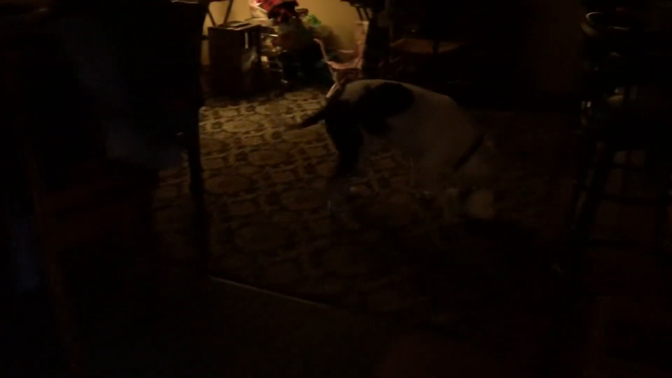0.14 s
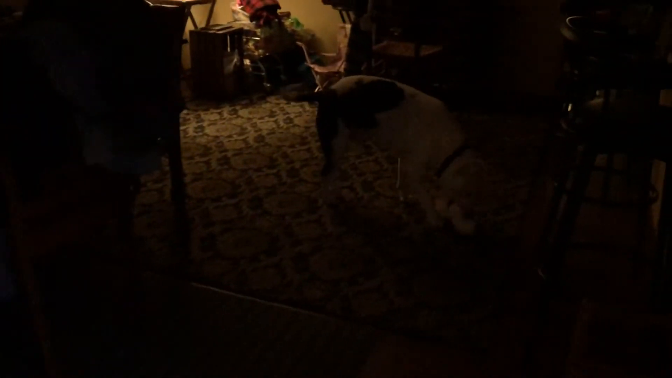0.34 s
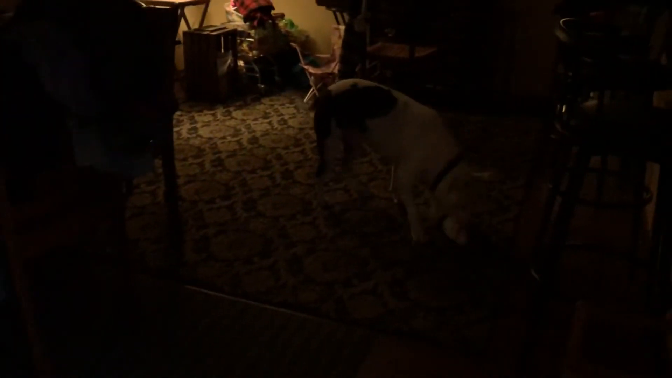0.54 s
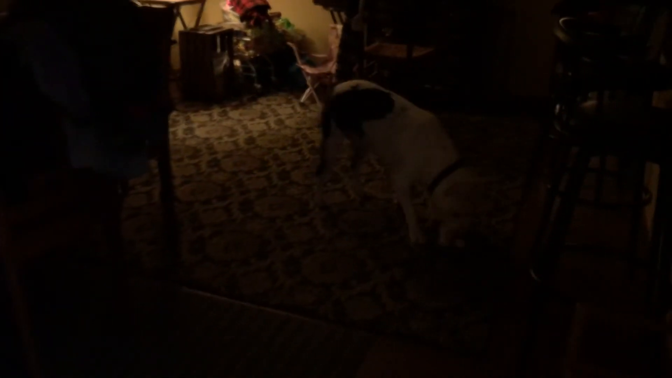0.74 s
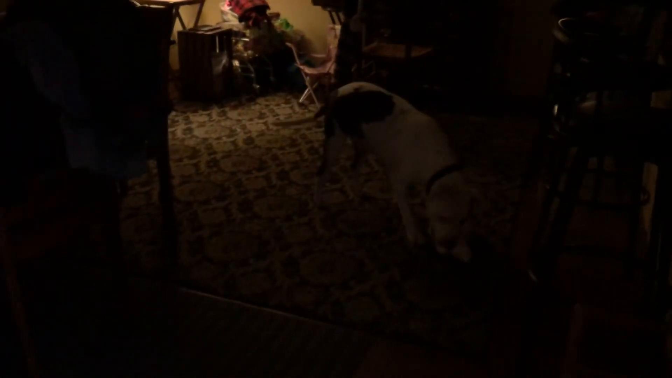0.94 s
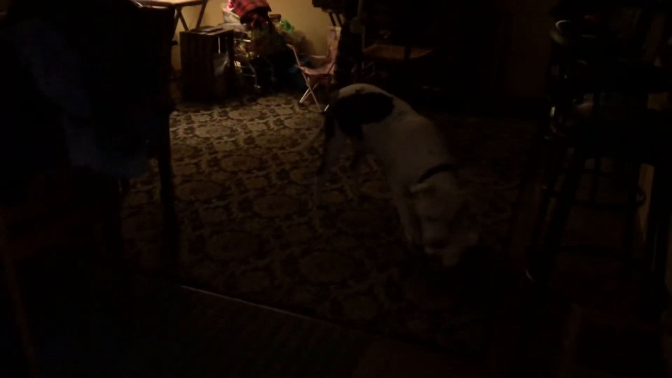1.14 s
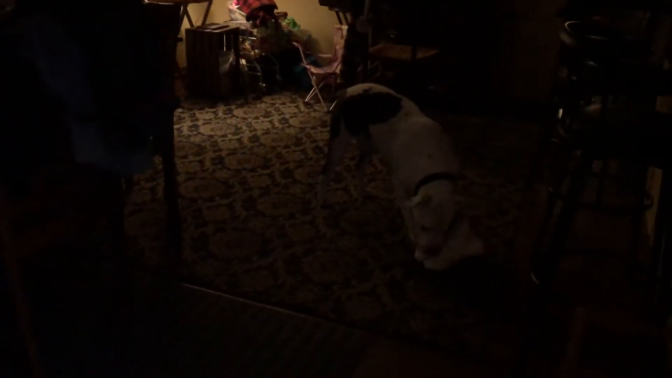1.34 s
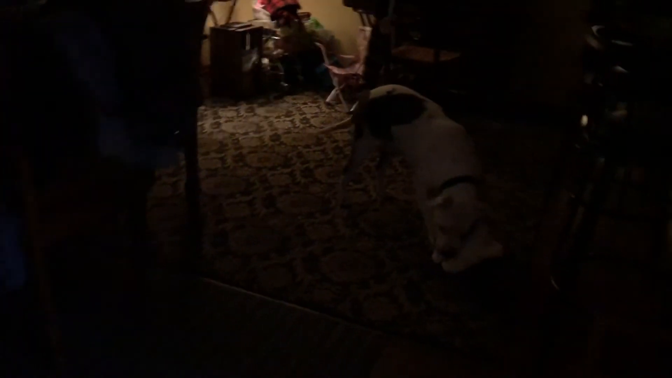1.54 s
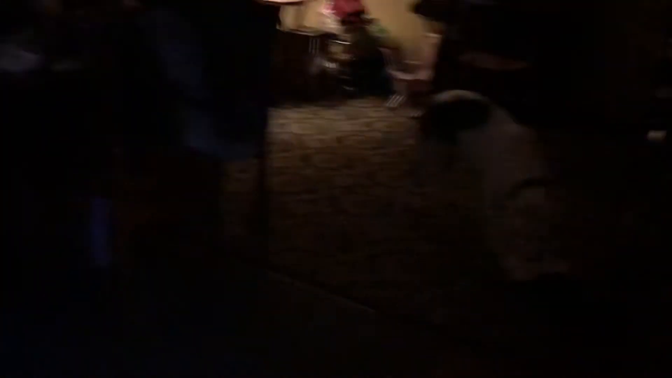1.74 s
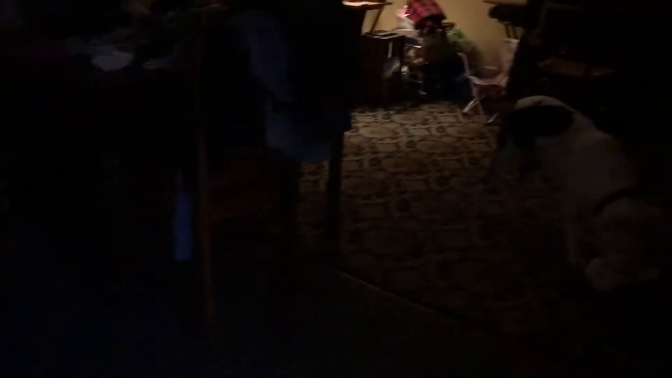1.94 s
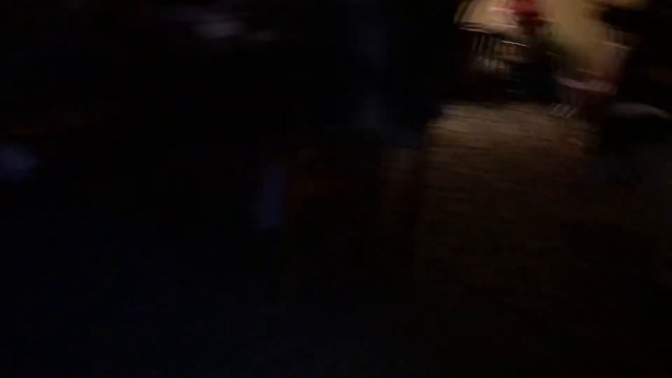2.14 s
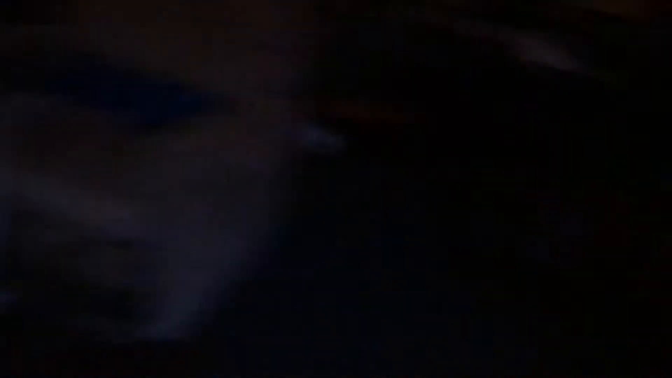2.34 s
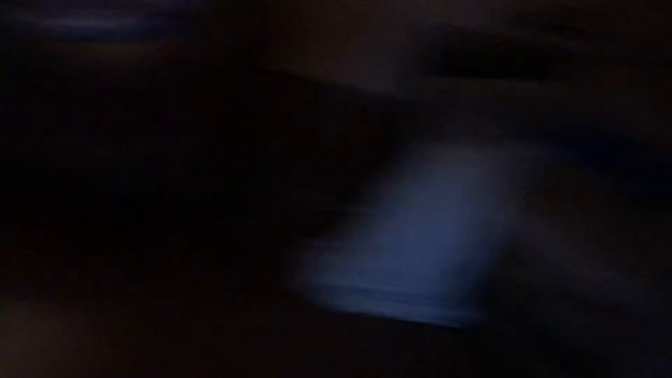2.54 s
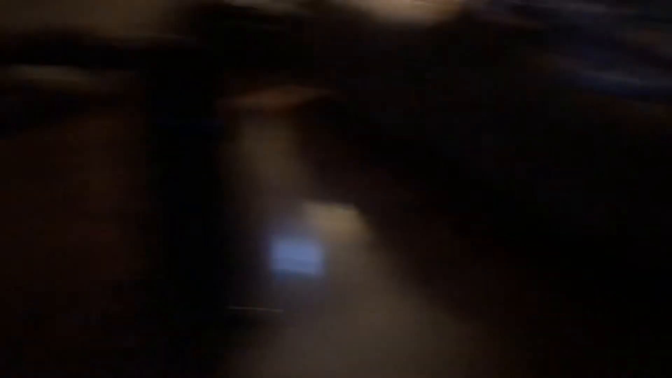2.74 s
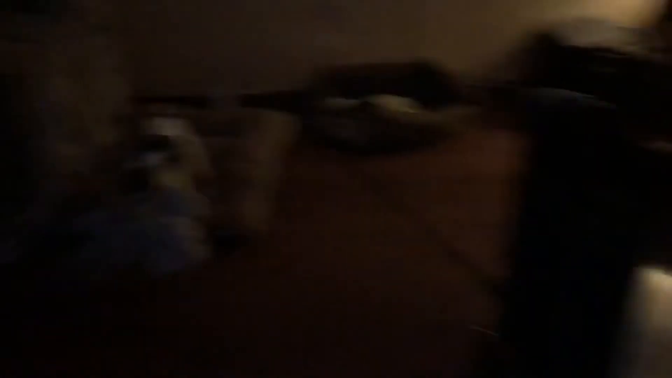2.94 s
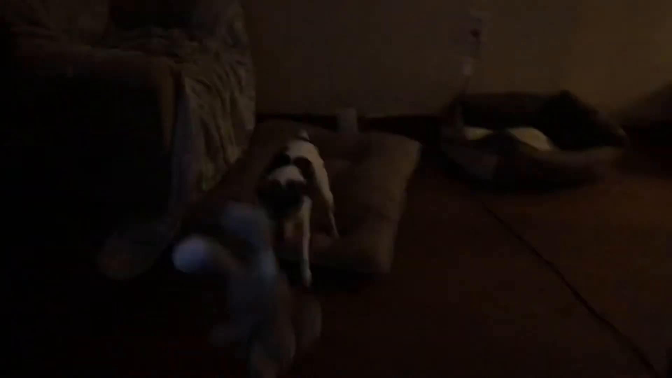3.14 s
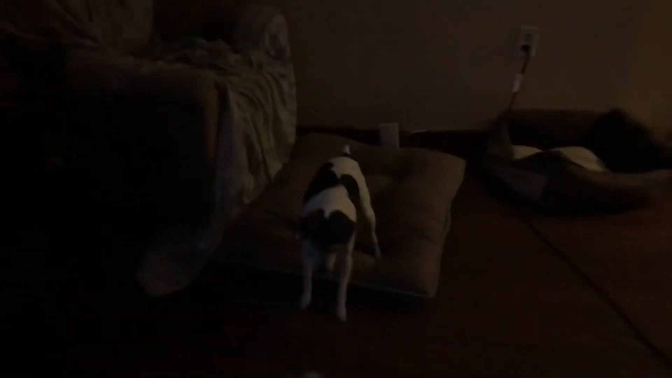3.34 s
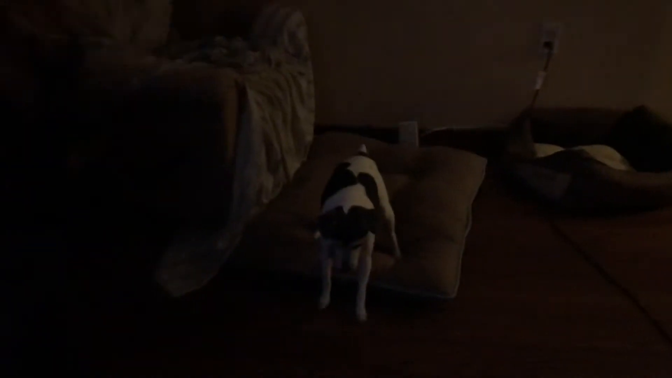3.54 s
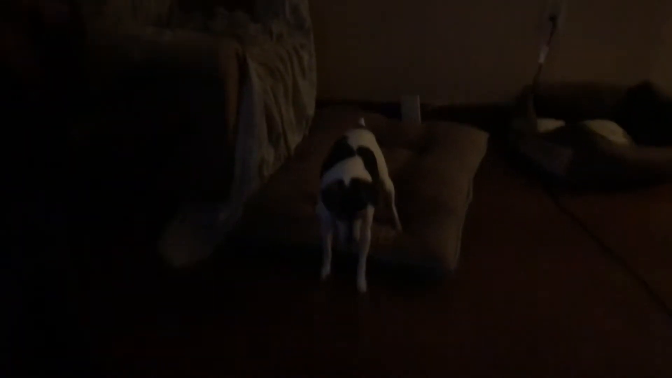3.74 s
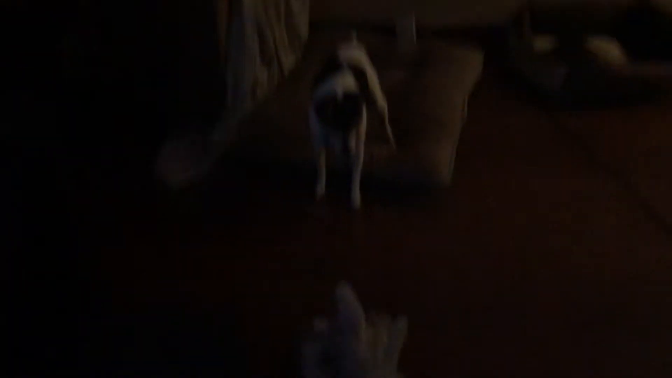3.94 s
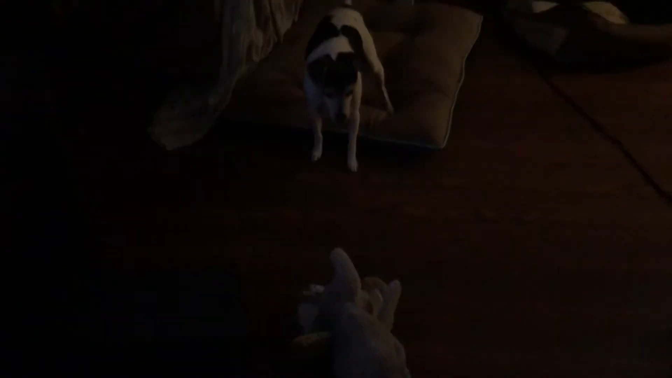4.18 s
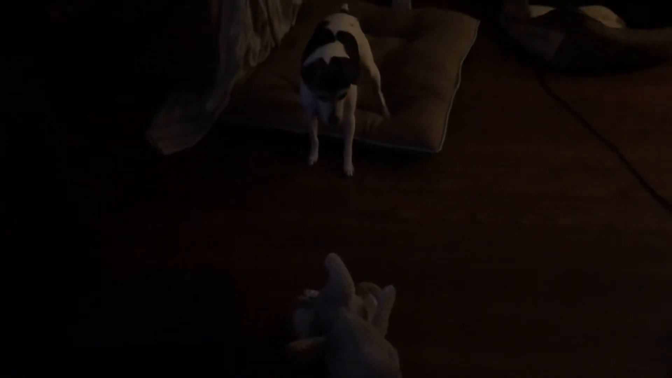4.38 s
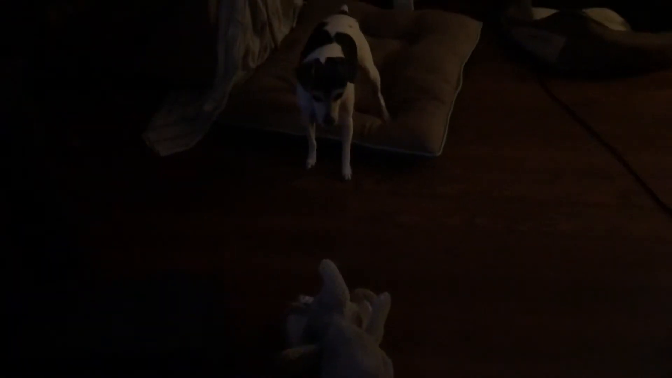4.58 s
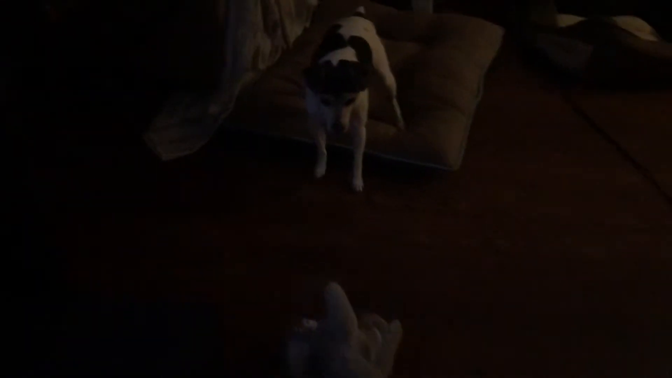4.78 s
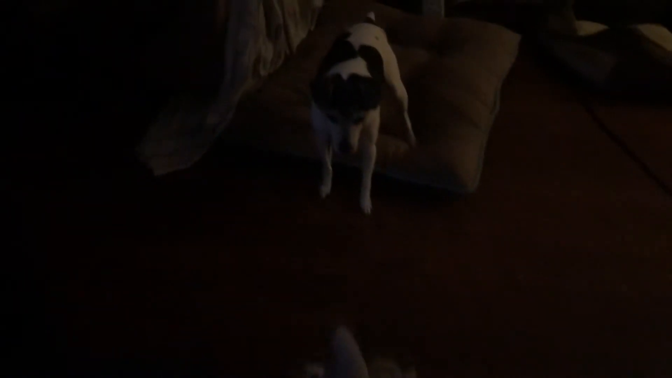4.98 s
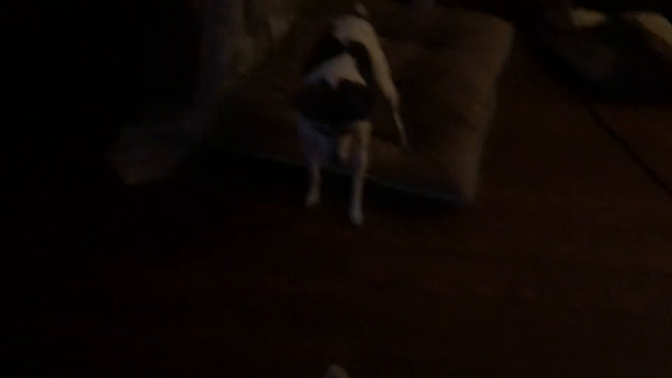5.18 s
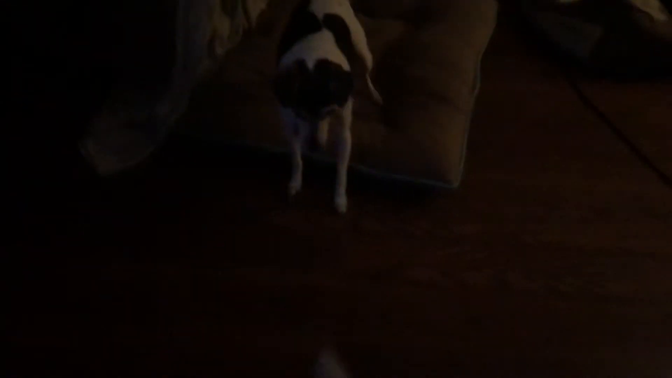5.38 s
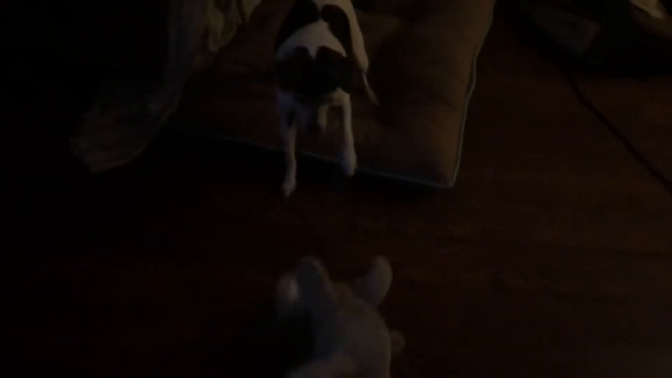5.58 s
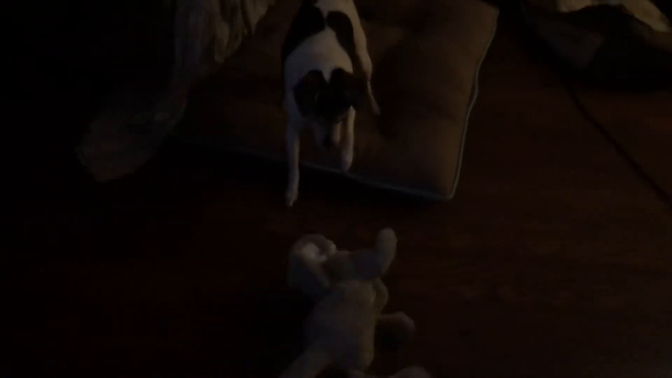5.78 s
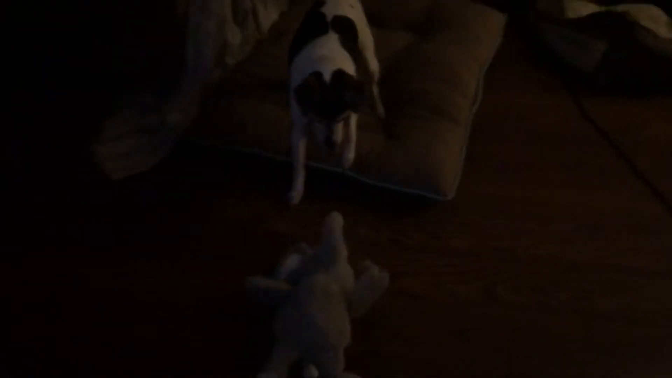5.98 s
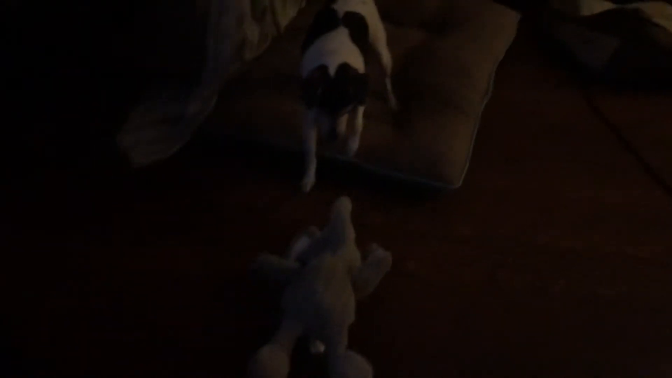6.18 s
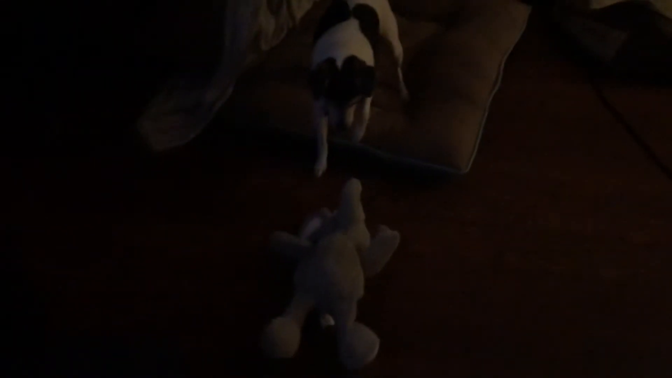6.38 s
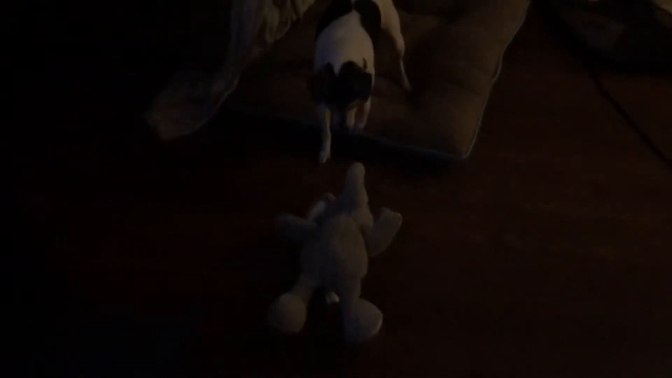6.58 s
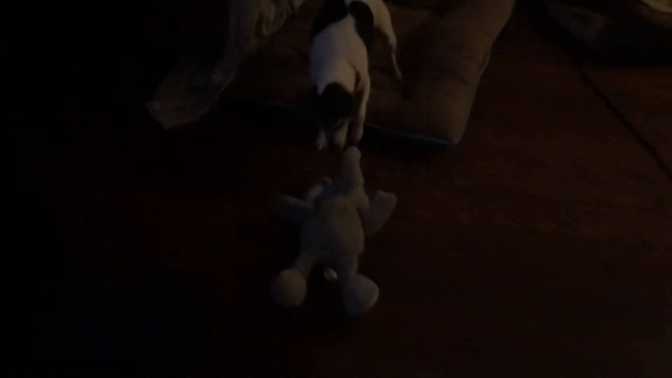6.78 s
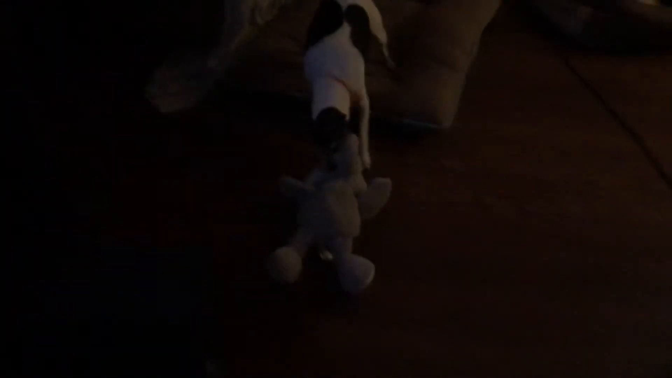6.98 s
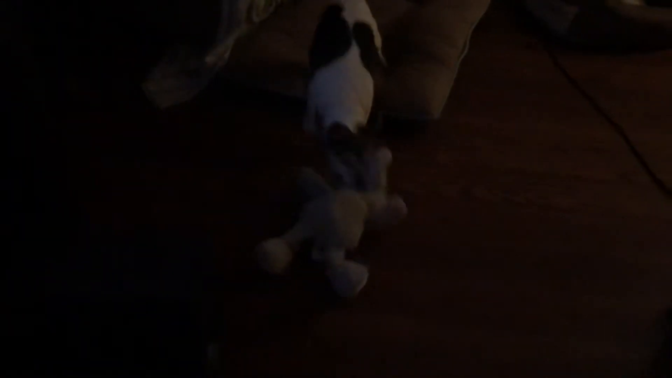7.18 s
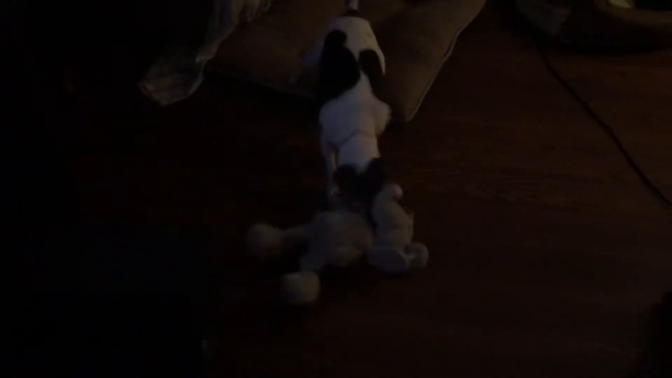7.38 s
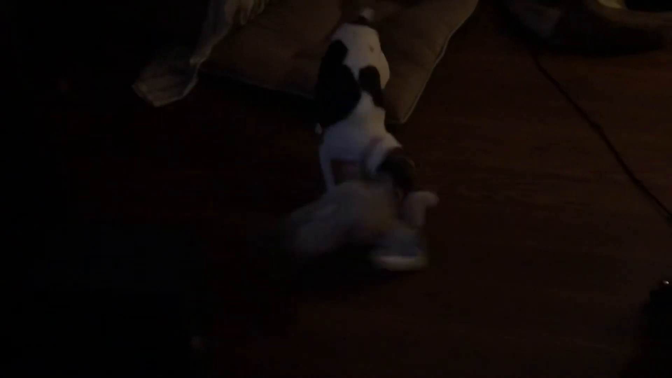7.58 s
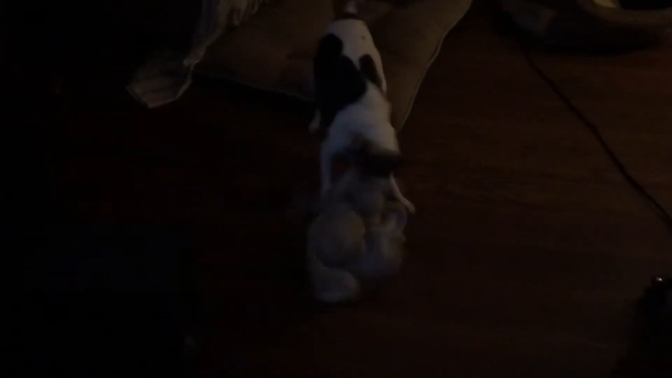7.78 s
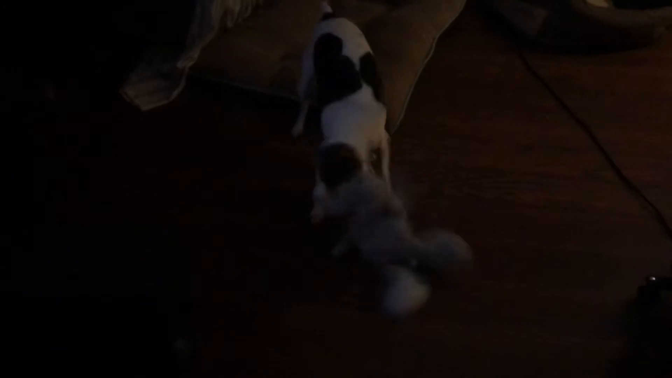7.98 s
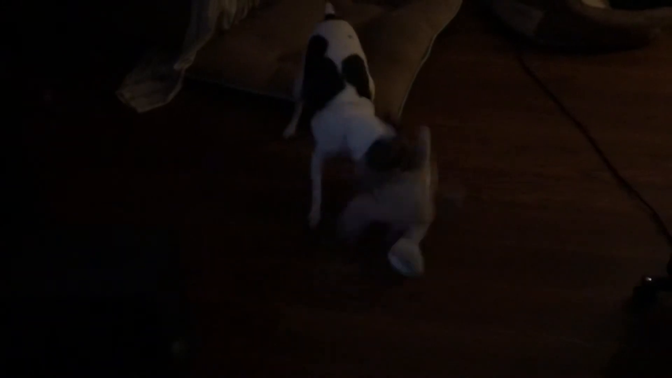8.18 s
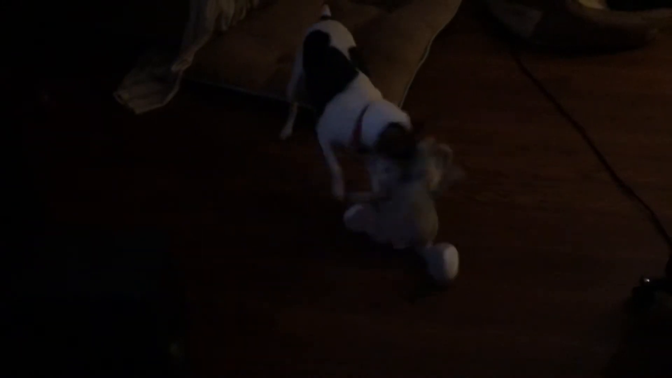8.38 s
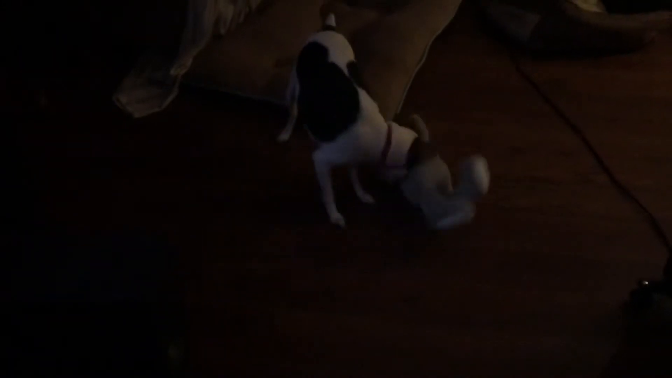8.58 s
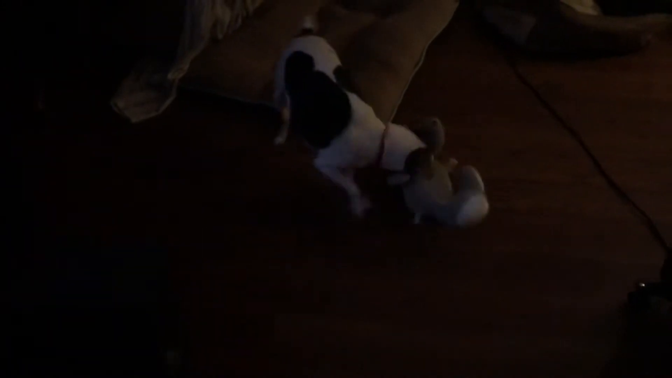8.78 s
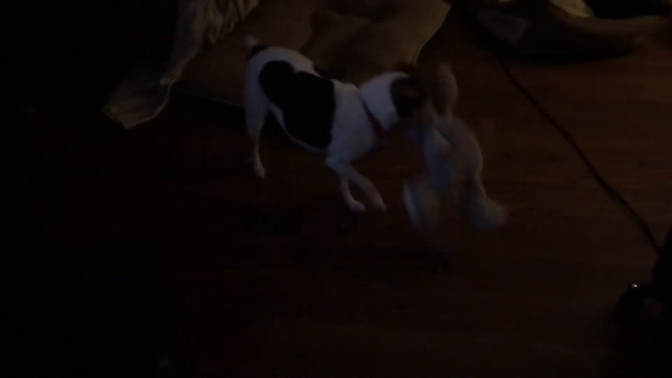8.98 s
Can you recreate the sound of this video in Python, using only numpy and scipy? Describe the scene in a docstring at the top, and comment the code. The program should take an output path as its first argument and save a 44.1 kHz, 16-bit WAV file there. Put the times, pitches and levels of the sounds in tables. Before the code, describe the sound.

Two puppies play on rug and wooden floor. A close squeaker chirps twice almost at once, followed by plush rustle and brief soft growling. A busy scuffle of paws, claws and a tag clink follows, then a handful of tiny distant squeaks. A faint whine passes in a calmer moment before the loudest part: plush thrashing, low floor thumps and sharp claw ticks. Handheld microphone, small room echo, faint low hush.

```python
"""A soft thump and a short scrape, then two clear toy squeaks: two puppies play on carpet and boards in a room.
A squeak is a reed's stack of harmonics with air hiss; paws, claws and a dragged toy are short shaped noises.
A collar tag rings as dying tones, one dog growls softly in throat pulses, and one whines a faint breathy tone.
Plush and cloth rustle as clumps of tiny clicks over a trembling floor, a few echoes and the still room's hush."""
import sys
import numpy as np
from scipy import signal
from scipy.fft import rfft, irfft
from scipy.io import wavfile

SR = 44100
rng = np.random.default_rng(int(sys.argv[2]) if len(sys.argv) > 2 else 0)


def master_out(mix):
    """Clip the mix to full scale and print it as 16-bit PCM to the path in sys.argv[1]."""
    frames = np.transpose(np.atleast_2d(mix))
    ceiling = np.clip(frames, -1, 1)
    pcm = np.round(ceiling * 32767).astype(np.int16)
    wavfile.write(sys.argv[1], SR, pcm)


N = 397782


def from_db(db):
    """Turns a level in dB into a gain."""
    return 10 ** (np.asarray(db) / 20)


def rms_one(x):
    """Scales a sound to an average strength (rms) of 1."""
    return x / np.sqrt(np.mean(x ** 2) + 1e-20)


def in_time(rows):
    """Draws straight lines between the rows of a table, one curve for each column after the time."""
    s, *columns = np.transpose(rows)
    return [np.interp(np.arange(N) / SR, s, column) for column in columns]


def at_hz(points, hz):
    """Reads a spectrum table at any frequency, on a log frequency axis."""
    point_hz, point_db = np.array(points).T
    return np.interp(np.log(hz), np.log(point_hz), point_db)


def drift(rate):
    """Random wandering of spread 1, quicker for a higher rate [Hz]; made at every 40th sample."""
    r = np.exp(-80 * np.pi * rate / SR)
    noise = rng.standard_normal(N // 40 + 2002)
    slow = signal.lfilter([1], [1, -2 * r, r * r], noise)[2000:]
    return np.interp(np.arange(N) / 40, np.arange(len(slow)), rms_one(slow))


def colour(x, spectrum):
    """Shapes noise to a spectrum that falls away beyond both ends; rms 1."""
    hz = np.arange(1, N // 2 + 2) * SR / N
    closed = [(spectrum[0][0] / 2, -90)] + list(spectrum) + [(spectrum[-1][0] * 2, -90)]
    return rms_one(irfft(rfft(x) * from_db(at_hz(closed, hz)), N))


def resonance(x, hz, width_hz):
    """Lets a band ring like a struck hollow body: two poles, gain 1 on top."""
    r = np.exp(-np.pi * width_hz / SR)
    poles = [1, -2 * r * np.cos(2 * np.pi * hz / SR), r * r]
    return signal.lfilter([(1 - r * r) / 2, 0, (r * r - 1) / 2], poles, x)


def add(out, s, sound, peak_db):
    """Lays a sound in at a time, with a given peak."""
    i = round(s * SR)
    out[i:i + len(sound)] += (sound * from_db(peak_db) / np.abs(sound).max())[:N - i]


# How strong each overtone of the squeaker is, for near and far, bite and release:
# (harmonic number, level [dB])
NEAR_BITE = [(1, -12.5), (2, -5), (3, -7.5), (4, -5.5), (5, -5.5), (6, -3), (7, 1), (8, -2), (9, -12),
             (10, -35.5), (11, -26.5), (12, -17.5), (13, -39), (14, -28.5)]
NEAR_RELEASE = [(1, -4.5), (2, -8.5), (3, -9.5), (4, -5.5), (5, -18.5), (6, -22.5), (7, -4.5), (8, -7),
                (9, -8), (10, -22), (11, -20), (12, -19), (13, -25), (14, -24.5)]
FAR_BITE = [(1, -2.5), (2, -3), (3, -5.5), (4, -4.5), (5, -1.5), (6, 0.5), (7, -1), (8, 1.5), (9, -3),
            (10, -9), (11, -22), (12, -21)]
FAR_RELEASE = [(1, -0.5), (2, -2), (3, -7), (4, -5.5), (5, -11.5), (6, -25), (7, -4.5), (8, 1.5), (9, -1),
               (10, -8), (11, -16), (12, -19)]
LAST_BITE = [(1, 1), (2, -9), (3, -9), (4, -9), (5, -13), (6, -20), (7, -17), (8, -6), (9, -7), (10, -6),
             (11, -13), (12, -15)]
# One voicing for each squeak, in order
VOICINGS = [NEAR_BITE, NEAR_RELEASE, FAR_BITE, FAR_RELEASE, FAR_BITE, FAR_RELEASE, FAR_RELEASE, LAST_BITE]
AIR_DB = -27.5   # air hiss through the reed, against its tone, before the stall
# As the air runs out the reed sags in pitch, breaks up and turns hollow
STALL_S, HOLLOW_DB_PER_SAG = 0.019, 75
BULB_HZ, BULB_WIDTH_HZ, BULB_DB = 1081, 12.5, 5   # the toy's hollow bulb rings on
SWELL_DB = 17.5   # a squeak swells in from this far below its level
# Each squeak of a bitten or released toy: (time [s], length before the stall [s], pitch at start [Hz],
# pitch at top [Hz], pitch at end [Hz], place of the top [0-1], level at start [dB], swell [s],
# fade over the length [dB], pitch unsteadiness [share], sag in the stall [share], roughness [0-1],
# part sent to the room [dB])
SQUEAKS = [(0.246, 0.051, 1052, 1112, 1067, 0.61, -29.5, 0.0026, 0, 0.0012, 0.11, 0.053, -3),
           (0.334, 0.073, 1057, 1083, 1068, 0.41, -35.5, 0.005, -0.5, 0.003, 0.032, 0.08, -3.5),
           (4.057, 0.03, 1230, 1300, 1245, 0.43, -38, 0.02, 4, .018, .012, 0.2, -1),
           (4.115, 0.028, 1284, 1301, 1258, 0.35, -42, 0.0034, 1, 0.017, .012, 0.22, -0.5),
           (4.444, 0.046, 1275, 1297, 1262, 0.53, -39, 0.018, 2.5, 0.019, .015, 0.2, -1.5),
           (4.541, 0.023, 1217, 1269, 1260, 0.48, -39.5, 0.018, -0.5, 0.015, 0.0088, 0.18, -1.5),
           (4.563, .038, 1329, 1363, 1345, 0.55, -40.5, 0.0037, 5, 0.013, 0.008, 0.19, 0.5),
           (5, 0.047, 1220, 1215, 1176, 0.3, -42, 0.014, 4.5, 0.009, 0.012, 0.074, -2)]


def squeaks():
    """A beating reed gives a stack of harmonics with air hissing past; it stalls at the end."""
    dry, to_room = np.zeros(N), np.zeros(N)
    for row, voicing in zip(SQUEAKS, VOICINGS):
        s, length, start_hz, top_hz, end_hz, top, level_db = row[:7]
        swell, fade_db, unsteadiness, sag, roughness, room_db = row[7:]
        t = np.arange(0, length + STALL_S, 1 / SR)
        stall = np.clip((t - length) / STALL_S, 0, 1)

        # The pitch arches with the air pressure
        slack = np.interp(t / length, [0, top, 1], [1, 0, 1]) ** 2
        pitch_hz = top_hz - slack * np.where(t < top * length, top_hz - start_hz, top_hz - end_hz)
        shake = (unsteadiness + 0.041 * stall) * drift(163)[:len(t)]
        cycles = np.cumsum(pitch_hz * (1 - sag * stall + shake)) / SR

        # Each harmonic gets its own gusts; the lowest one grows in the stall
        k, db = np.transpose(voicing)[:, :, None]
        noise = rng.standard_normal((len(k), len(t)))
        gusts = rms_one(signal.lfilter([1], [1, -1.9, .9025], noise))
        db = db + HOLLOW_DB_PER_SAG * sag * np.minimum(4 * stall, 1) * (k == 1)
        waves = np.sin(2 * np.pi * (k * cycles + rng.random(k.shape)))
        tone = rms_one(np.sum(from_db(db) * (1 + roughness * gusts) * waves, axis=0))

        air = rms_one(resonance(rng.standard_normal(len(t)), 10500, 6000))
        swell_in = from_db(-SWELL_DB * np.clip(1 - t / swell, 0, 1))
        edges = np.minimum(t / 0.0054, 1) * (1 - stall) * swell_in
        sound = (tone + from_db(AIR_DB + 9.3 * stall) * air) * edges
        sound = sound * from_db(level_db - fade_db * t / length)
        i = round(s * SR)
        dry[i:i + len(t)] += sound
        to_room[i:i + len(t)] += sound * from_db(room_db)
    near = np.arange(N) < SR      # only the near toy's bulb is heard, fed during the first second
    bulb = resonance(dry * near + 1e-18, BULB_HZ, BULB_WIDTH_HZ)
    return dry + from_db(BULB_DB) * bulb, to_room


# Paws scuffing: (time [s], peak [dB], added treble band [dB], time to die by 60 dB [s])
SCUFFS = [(2.0573, -32, -35, 0.4), (2.39, -36.5, -5, 0.38), (2.4815, -34, -11, 0.24),
          (2.541, -31.5, -32, 0.16), (2.59, -27, -17, 0.21), (2.67, -32.5, -37, 0.25),
          (2.8313, -26.5, 1, 0.52), (3.1682, -21.5, -1.5, 0.21), (3.419, -35.5, 0, 0.28),
          (3.49, -58, 18, 0.25), (3.625, -33.5, -7, 0.22), (4.901, -51.5, -29, 0.11),
          (5.2646, -49, -10, 0.25), (5.3103, -32.5, -28, 0.13), (5.888, -30.5, -21, 0.085),
          (6.8952, -33, -27, 0.11), (6.9283, -30.5, -35, 0.16), (7.0752, -38.5, -14, 0.41),
          (7.4099, -20.5, -5, 0.19), (7.922, -21, 21, 0.32), (8.4446, -29.5, -2, 0.45),
          (8.7176, -21, 9, 0.11), (8.836, -26, 13, 0.12), (9.0048, -25, 5, 0.085)]


def scuffs():
    """Rubbing paws make dying bursts of noise with a sharper start; each is cut off after 0.25 s."""
    out, t = np.zeros(N), np.arange(SR // 4) / SR
    for s, peak_db, treble_db, t60 in SCUFFS:
        decay = from_db(-60 * t / t60) + 0.71 * from_db(-60 * t / 0.0068)
        noise = rng.standard_normal(len(t)) * decay
        treble = from_db(treble_db) * resonance(noise, 7500, 11400)
        add(out, s, resonance(noise, 4090, 2400) + treble, peak_db)
    return out


# Claw ticks: (time [s], peak [dB], centre [Hz])
TICKS = [(2.7634, -31, 2250), (2.9402, -22, 3040), (3.0772, -28, 4340), (3.1267, -35, 2810),
         (3.258, -33, 3030), (3.2881, -21, 2630), (3.3132, -25, 4500), (3.32, -36, 4000),
         (3.336, -32.5, 4000), (3.449, -30.5, 4000), (3.514, -21, 5100), (3.675, -29, 9050),
         (3.6894, -29, 2250), (3.7678, -46, 3890), (3.8766, -49, 3990), (5.3452, -26.5, 4360),
         (5.3836, -26, 3080), (5.43, -28.5, 3000), (5.443, -34, 3500), (5.476, -33, 2700),
         (5.499, -40, 1800), (5.5904, -55, 4980), (5.6104, -33.5, 4690), (5.688, -35, 4970),
         (5.8546, -43, 5260), (5.914, -32, 3500), (6.0687, -33, 4260), (6.5967, -53, 6730),
         (6.8573, -52, 2810), (7.251, -24, 7400), (7.4095, -14.5, 6950), (7.418, -19, 7500),
         (7.546, -22, 3700), (7.639, -19, 5000), (8.3756, -30, 3750), (8.102, -23, 5000),
         (8.395, -23.5, 5100), (8.5803, -23.5, 3540), (8.7174, -21, 4200)]


def ticks():
    """A claw striking makes a very short crack with a little tail and some high treble."""
    out, t = np.zeros(N), np.arange(SR // 4) / SR
    for s, peak_db, hz in TICKS:
        decay = from_db(-60 * t / 0.0051) + 0.36 * from_db(-60 * t / 0.027)
        crack = rng.standard_normal(len(t)) * decay
        add(out, s, resonance(crack, hz, 2800) + 0.28 * resonance(crack, 11100, 8900), peak_db)
    return out


# Paws and toy landing on boards; the push is laid in 5 dB below the strength:
# (time [s], strength [dB], centre [Hz], knock against strength [dB], time to die by 60 dB [s])
THUMPS = [(0.071, -43.5, 242, -17, 0.12), (0.509, -42.5, 130, -16, 0.069), (1.2, -44, 157, -20.5, 0.22),
          (1.279, -45, 181, -17, 0.082), (2.696, -38, 189, -10, 0.08), (2.839, -42, 490, -10, 0.1),
          (3.173, -42.5, 213, -2, 0.078), (4.656, -49.5, 434, -11, 0.23), (5.187, -47, 395, -5.5, 0.21),
          (5.281, -44.5, 198, 0, 0.052), (6.896, -43.5, 238, -4.5, 0.16), (7.067, -40, 250, -5, 0.12),
          (7.254, -36.5, 360, -16, 0.11), (7.36, -20, 196, -12.5, 0.053), (7.473, -31.5, 337, -24, 0.29),
          (7.66, -23, 191, -5.5, 0.095), (7.914, -30, 193, -11, 0.079), (7.955, -29.5, 200, -10, 0.15),
          (8.143, -32.5, 210, -26, 0.053), (8.392, -49, 380, -15, 0.068), (8.558, -31, 220, -19, 0.055),
          (8.723, -40.5, 167, -1, 0.076), (8.809, -36, 164, -13, 0.067), (8.935, -45, 118, -19, 0.06)]


def thumps():
    """A landing gives a low damped push of noise and a knock that slides down to the board's tone."""
    out, t = np.zeros(N), np.arange(SR // 4) / SR
    for s, strength_db, hz, knock_db, t60 in THUMPS:
        decay = from_db(-60 * t / t60)
        push = rng.standard_normal(len(t)) * decay * np.minimum(t / 0.0031, 1)
        add(out, s, resonance(resonance(push, hz, 96), hz, 250), strength_db - 5.0)
        # In boards the high tones arrive first
        bend = np.cumsum(hz + 750 * np.exp(-t / 0.01112)) / SR
        add(out, s, np.sin(2 * np.pi * bend) * decay, strength_db + knock_db)
    return out


# The toy dragged, a hollow rasp: (time [s], peak [dB], centre [Hz], length [s])
RASPS = [(0.23, -41.5, 2040, 0.021), (1.008, -41, 1390, 0.028), (2.392, -41, 1450, 0.036),
         (2.73, -31.5, 1730, 0.07), (3.612, -40.5, 1250, 0.046), (3.868, -45.5, 1400, 0.031),
         (5.18, -49, 1430, 0.029), (7.358, -32, 1120, 0.026), (7.59, -33, 1240, 0.031),
         (7.997, -32, 1320, 0.059), (8.205, -35.5, 1420, 0.046), (8.754, -31.5, 1620, 0.073),
         (8.83, -37, 3630, 0.042)]


def rasps():
    """A dragging stroke is noise that swells and sinks, made hollow by two resonances in a row."""
    out, t = np.zeros(N), np.arange(SR // 4) / SR
    for s, peak_db, hz, length in RASPS:
        stroke = np.sin(np.pi * np.minimum(t / length, 1)) * rng.standard_normal(len(t))
        add(out, s, resonance(resonance(stroke, hz, 0.394 * hz), hz, 1.1 * hz), peak_db)
    return out


# Touches of the collar tag: (time [s], peak [dB])
TINKLES = [(0.655, -64.5), (0.681, -52), (0.853, -46), (0.878, -44), (1.784, -48), (2.5611, -53),
           (2.798, -32), (5.6815, -46)]
# Ringing tones of the tag: (pitch [Hz], level before chance [dB], time to die by 60 dB [s])
TAG = [(7887, -22, 0.1), (10450, -1, 0.18), (13600, -6, 0.1)]


def tag():
    """Each touch rings every mode of the small metal disc, in a chance mix."""
    out, t = np.zeros(N), np.arange(SR // 4) / SR
    for s, peak_db in TINKLES:
        ring = np.zeros(len(t))
        for hz, db, t60 in TAG:
            chance_db = rng.normal(0, 0.7)
            ring += from_db(db + chance_db - 60 * t / t60) * np.sin(2 * np.pi * hz * t)
        add(out, s, ring, peak_db)
    return out


# The growls, one list each: (time [s], throat resonance [Hz], level of each resonance before its own cut [dB])
GROWL = [
    [(0.72, 273, -66), (0.734, 280, -55), (0.76, 298, -42), (0.784, 293, -46), (0.88, 282, -55)],
    [(1.68, 242, -59), (1.716, 236, -47.5), (1.756, 334, -41), (1.81, 358, -43), (1.888, 290, -45),
     (1.96, 355, -40), (2.104, 278, -42), (2.142, 272, -52), (2.154, 234, -46), (2.28, 220, -75)],
]


def growl():
    """Uneven slow throat pulses ring a moving resonance and a weaker one an octave up."""
    throat_hz, level_db = in_time(np.concatenate(GROWL))
    cycles = np.cumsum(45 * from_db(1.6 * drift(30))) / SR      # about 45 pulses a second
    pulses = np.diff(np.floor(cycles), prepend=0) * from_db(rng.normal(0, 2.4, N))
    pulses = pulses + 0.04 * rng.standard_normal(N)      # a little breath
    glide = np.exp(2j * np.pi * np.cumsum(throat_hz) / SR)
    out = np.zeros(N)
    for k, db, width_hz in [(1, -3.0, 142), (2, -12.5, 190)]:
        # Shifting down, low-passing and shifting back follows the glide
        r = np.exp(-np.pi * width_hz / SR)
        shifted = signal.lfilter([1], [1, -2 * r, r * r], pulses / glide ** k)
        out += from_db(db) * rms_one(np.imag(glide ** k * shifted))
    t = np.arange(N) / SR
    on = sum((t > rows[0][0]) * (t < rows[-1][0]) for rows in GROWL)
    return out * from_db(level_db) * on


# A faint whine: (time [s], pitch before unsteadiness [Hz], level [dB])
WHIMPER = [(6.14, 1086, -75), (6.17, 1127, -60), (6.22, 1230, -63), (6.26, 1304, -65), (6.29, 1400, -78)]


def whimper():
    """A rising tone with its octave, made breathy by a fast, shaky pitch."""
    pitch_hz, level_db = in_time(WHIMPER)
    cycles = np.cumsum(pitch_hz * (1 + .07 * drift(151.5))) / SR
    t = np.arange(N) / SR
    on = (t > WHIMPER[0][0]) * (t < WHIMPER[-1][0])
    tone = np.sin(2 * np.pi * cycles) + from_db(-6) * np.sin(4 * np.pi * cycles)
    return on * from_db(level_db) * tone


def fibres(per_s, spread_db, clump_db):
    """Fibres catch and slip as clicks of uneven size, in clumps, over a smooth rub."""
    sizes = from_db(spread_db * np.minimum(rng.exponential(1, N), 3.5)) * rng.choice([-1, 1], N)
    chance = per_s * from_db(4 * drift(15)) / SR
    slips = rms_one(sizes * (rng.random(N) < chance))
    return (0.63 * slips + rng.standard_normal(N)) * from_db(clump_db * drift(40.0))


# Borders between the bands in which the rustle flickers apart: (frequency [Hz])
PATCH_EDGES_HZ = [700, 1100, 1700, 2500, 3600, 5200, 7500, 11000]


def patches(x, patchy_db, rate):
    """Each band swells and sinks on its own as the cloth folds; rms 1."""
    hz = np.arange(N // 2 + 1) * SR / N
    band, spectrum = np.searchsorted(PATCH_EDGES_HZ, hz), rfft(x)
    out = np.zeros(N)
    for k in range(band.max() + 1):
        out += irfft(spectrum * (band == k), N) * from_db(patchy_db * drift(rate))
    return rms_one(out)


# Tone colours of the bright rustle, the dull drag and the floor: (frequency [Hz], level per Hz [dB])
RUSTLE = [(1180, -16), (2000, -5), (6250, -5.5), (10700, -12.5), (11900, -14.5), (15200, -17.5), (16000, 0)]
DULL = [(150, -33.5), (250, -5), (604, -2), (1010, 1), (1270, -0.5), (1390, 0), (2600, -8.5), (3380, -6.5),
        (5720, -120)]
RUMBLE = [(12, -59), (20, -16), (128, 1), (204, 3.5), (286, -14), (350, -9.5), (460, -27.5), (770, -120)]
# The dogs stirring, under everything:
# (time [s], rustle level [dB], dull drag against the rustle [dB], floor rumble level [dB])
STIR = [(0, -75.5, 5.5, -60.5), (.2, -68.5, 2, -62), (.25, -60, 10.5, -57.5), (.53, -62, 3.5, -65),
        (.69, -56.5, -0.5, -69), (1.2, -55.5, 1.5, -57.5), (1.52, -71.5, 4, -81), (1.74, -63.5, 10, -62),
        (2.03, -55.5, -1.5, -84), (2.3, -75, -10, -75), (2.7, -59, 2, -52), (3.12, -57, -4.5, -68),
        (3.6, -63, 5.5, -67.5), (3.8, -68.5, -9, -74), (4.05, -69.5, -1.5, -85), (4.31, -77, -1, -74),
        (4.75, -68.5, -4.5, -67.5), (4.9, -75, 9.5, -61.5), (5.15, -68.5, -4, -82),
        (5.29, -62.5, 11.5, -79), (5.55, -61, -7.5, -71), (6.05, -57.5, -4, -71.5), (6.13, -67, -25, -87),
        (6.33, -78.5, -0.5, -78), (6.84, -80.5, -0.5, -75.5), (6.87, -55, -9, -80), (7.05, -62, -1, -63),
        (7.39, -51.5, 4.5, -54.5), (8.02, -41.5, -1, -54.5), (8.26, -50.5, -27, -63), (8.46, -52, 0, -66),
        (8.7, -48, -5, -51.5), (9.02, -49.5, -7.5, -59)]
# Each swish of plush or cloth: (time at full level [s], level [dB], rise over EDGE_DB [s], hold [s],
# fall over EDGE_DB [s], dull drag against the swish [dB])
SWISHES = [(0.844, -52, 0.32, 0.073, 0.25, 0.5), (0.993, -43, 0.11, 0.016, 0.36, -10),
           (1.201, -44, 0.11, .01, 0.1, -12), (1.288, -49, 0.13, 0.017, 0.12, -10),
           (1.619, -56, 0.059, 0.03, 0.18, 0.5), (1.79, -50, 0.048, .01, 0.35, -10),
           (2.073, -48.5, 0.07, .01, 0.44, -3), (2.602, -49, 0.47, 0.0041, 0.038, 2),
           (2.754, -43, 0.084, .01, 0.22, 0.5), (2.85, -39, 0.1, .005, 0.13, -5),
           (2.934, -37, 0.073, 0.0055, 0.21, -8.5), (3.177, -39.5, 0.023, .005, 0.23, -9),
           (3.305, -44, 0.1, 0.0055, 0.078, -5), (3.516, -38.5, 0.1, .005, 0.097, -7.5),
           (3.684, -45, 0.16, .005, 0.058, -13), (3.917, -61.5, .4, 0.009, 0.15, -3),
           (5.319, -44, 0.0059, 0.06, 0.27, -6.5), (5.766, -56, 0.044, 0.02, 0.084, 1),
           (5.902, -40.5, 0.032, 0.011, 0.087, -6), (6.256, -63.5, 0.37, .01, 0.063, 2.5),
           (6.926, -59.5, 0.06, .01, 0.12, 2), (7.117, -43, 0.078, 0.082, 0.082, -2.5),
           (7.251, -40.5, 0.011, .005, 0.19, -28), (7.496, -39.5, 0.22, 0.18, 0.12, -6.5),
           (7.772, -37, 0.24, .01, 0.089, -23), (7.85, -36.5, .05, 0.034, 0.24, -22),
           (7.926, -37.5, 0.17, .005, 0.14, -29), (8.095, -39.5, 0.59, .01, 0.99, -6.5),
           (8.49, -36, 0.043, 0.0045, 0.19, -6.5), (8.749, -41.5, 0.029, .01, 0.21, -0.5)]
EDGE_DB = 20   # climb in one rise time, drop in one fall time; each edge lasts two of them
# After a thump the floor trembles on: level, share of the thump's dB added to it, time to die by 60 dB
TREMBLE_DB, TREMBLE_FOLLOWS, TREMBLE_T60_S = -34.5, 0.47, 0.38


def movement():
    """Rustling plush and cloth, a duller drag beneath, and the floor trembling; powers add up."""
    rustle_db, dull_db, rumble_db = in_time(STIR)
    t = np.arange(N) / SR
    # Doubling the dB turns a gain into a power
    bright = from_db(2 * rustle_db)
    dull = from_db(2 * (rustle_db + dull_db))
    rumble = from_db(2 * rumble_db)
    for s, level_db, rise, hold, fall, share_db in SWISHES:
        near = slice(round(max(s - 2 * rise, 0) * SR), round((s + hold + 2 * fall) * SR))
        before, after = (s - t[near]) / rise, (t[near] - s - hold) / fall
        off = np.maximum(np.maximum(before, after), 0)
        power = from_db(2 * (level_db - EDGE_DB * off))
        bright[near] += power
        dull[near] += power * from_db(2 * share_db)
    for s, strength_db, *_ in THUMPS:
        after = slice(round(s * SR), round((s + TREMBLE_T60_S) * SR))
        fading_db = -60 * (t[after] - s) / TREMBLE_T60_S
        rumble[after] += from_db(2 * (TREMBLE_DB + TREMBLE_FOLLOWS * strength_db + fading_db))
    rustle_noise = patches(colour(fibres(700, 3.25, 1.43), RUSTLE), 1.5, 23.0)
    drag_noise = patches(colour(fibres(500, 3.2, 1.6), DULL), 2.4, 22.0)
    floor_noise = from_db(3.1 * drift(7.1)) * colour(rng.standard_normal(N), RUMBLE)
    return np.sqrt(bright) * rustle_noise + np.sqrt(dull) * drag_noise + np.sqrt(rumble) * floor_noise


ROOM_T60_S, WALL_CUT_HZ = 0.36, 3250   # time for the low echoes to die by 60 dB; where they lose treble


def room(x):
    """Dense echoes: noise that dies away, the treble sooner."""
    t = np.arange(SR // 2) / SR
    low = signal.lfilter(*signal.butter(1, WALL_CUT_HZ, fs=SR), rng.standard_normal(len(t)))
    full = rng.standard_normal(len(t)) * from_db(-60 * t / 0.4)      # with treble, so it dies sooner
    echoes = (low + full) * from_db(-60 * t / ROOM_T60_S) * (t > .004)
    return signal.fftconvolve(x, echoes / np.linalg.norm(echoes))[:N]


# Tone colour of the still room: (frequency [Hz], level per Hz [dB])
HUSH = [(18, -51.5), (30, -11), (86, -3.5), (124, -12), (170, -8.5), (259, -12.5), (394, -14.5),
        (988, -28.5), (4420, -35), (6550, -36.5), (16000, -37)]
HUSH_DB = -68


def hush():
    """The still room is a steady, very soft noise, strongest in the bass."""
    return from_db(HUSH_DB) * colour(rng.standard_normal(N), HUSH)


def scene():
    """All sources in one room, over its hush."""
    toy, toy_to_room = squeaks()
    near = scuffs() + ticks() + thumps() + rasps() + tag() + growl()
    echoes = room(toy_to_room + from_db(-7.5) * near)
    return (toy + near + whimper() + movement() + echoes + hush())[None]


def record(dry):
    """A steep filter cuts the top treble: 60 dB down from 16300 Hz up."""
    return signal.sosfilt(signal.cheby2(14, 60, 16300, fs=SR, output="sos"), dry)


dry = scene()
out = record(dry)
master_out(out)
```